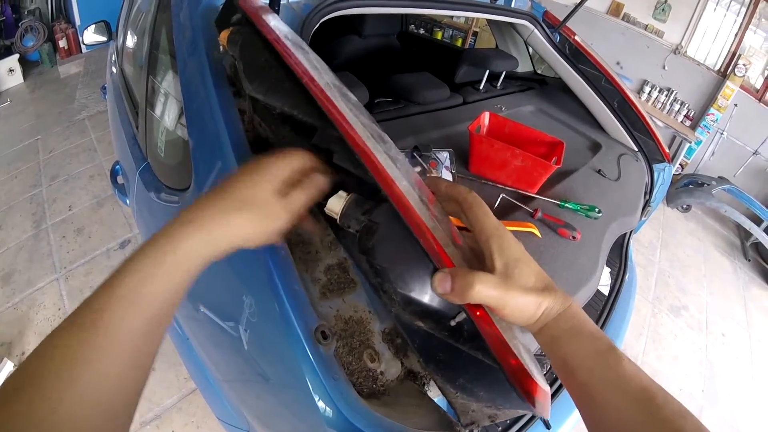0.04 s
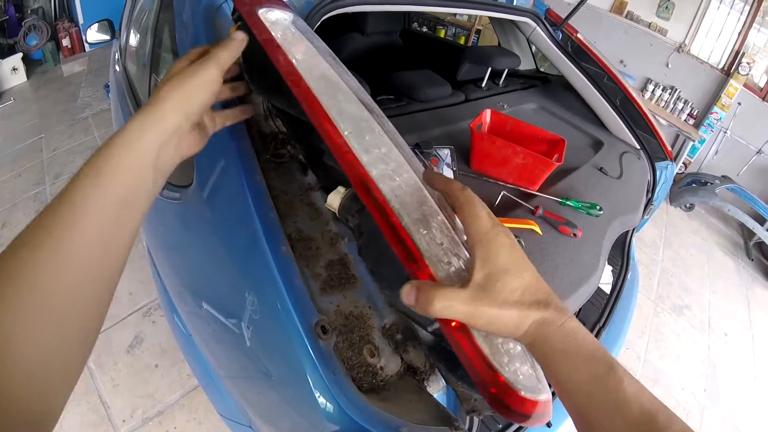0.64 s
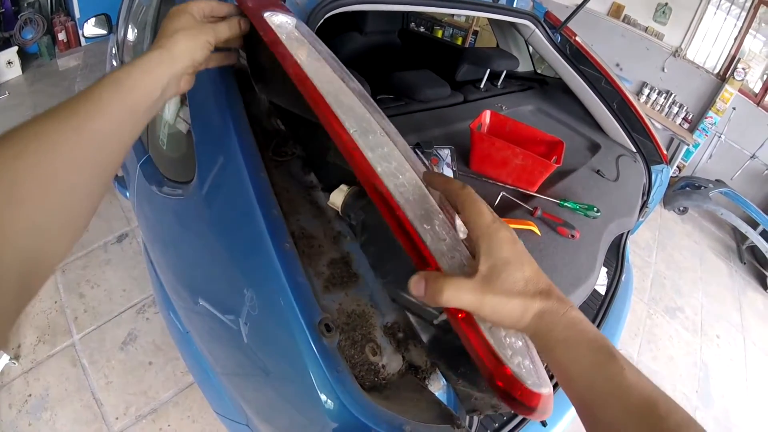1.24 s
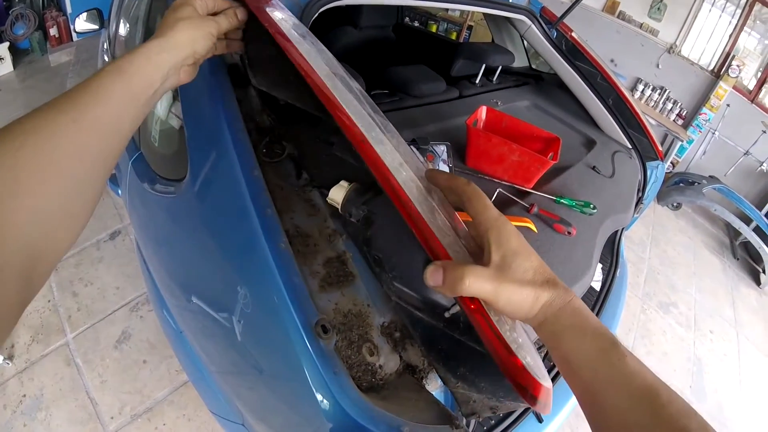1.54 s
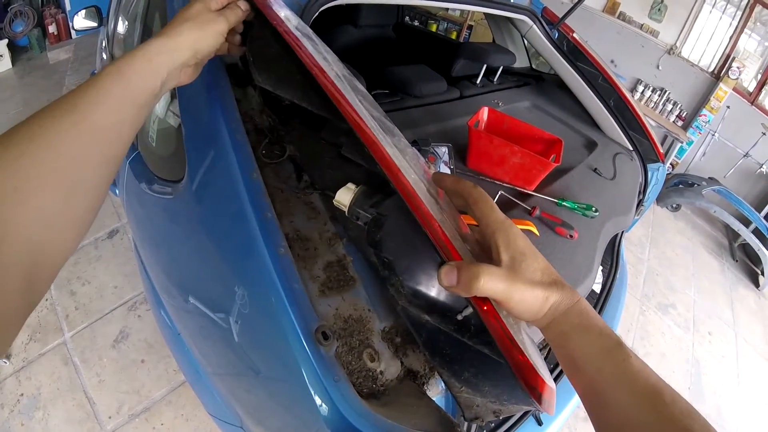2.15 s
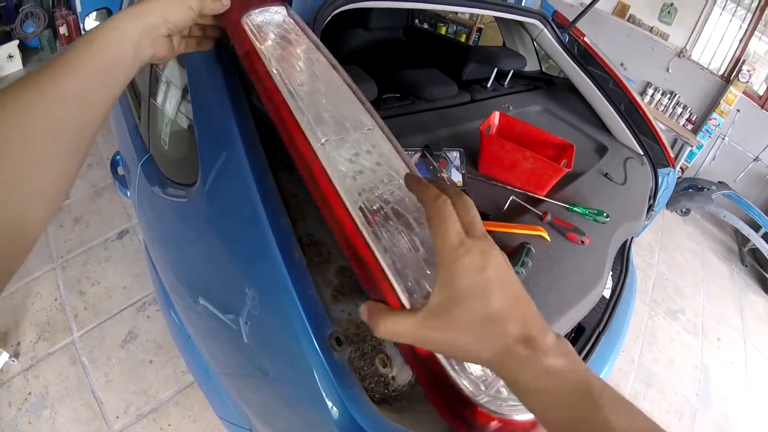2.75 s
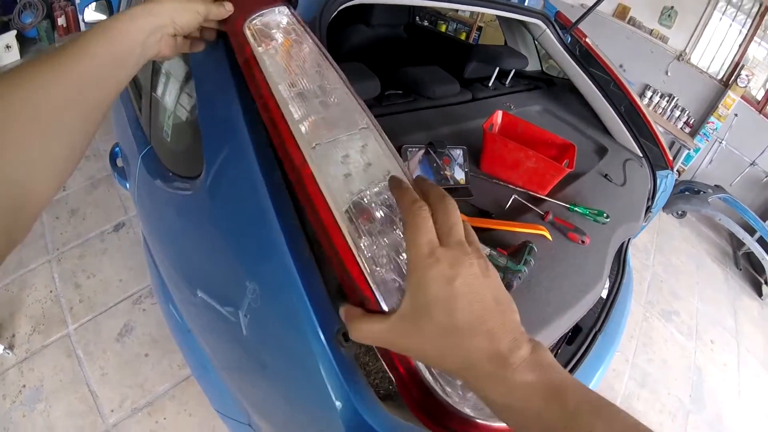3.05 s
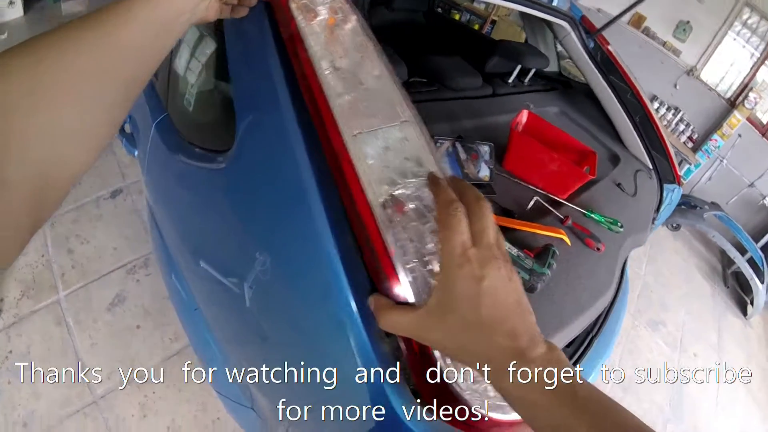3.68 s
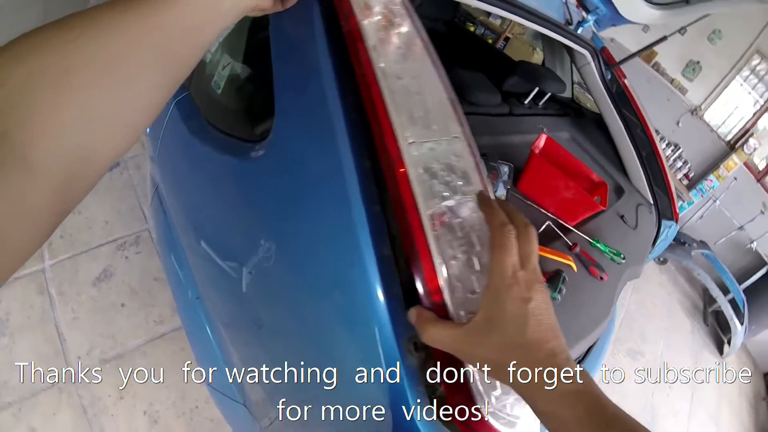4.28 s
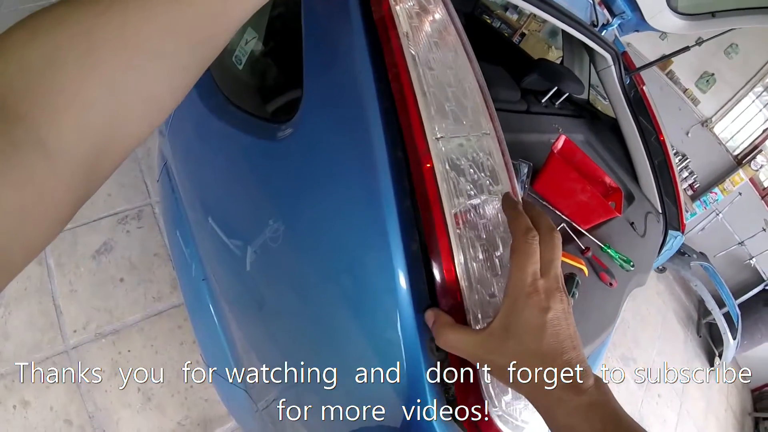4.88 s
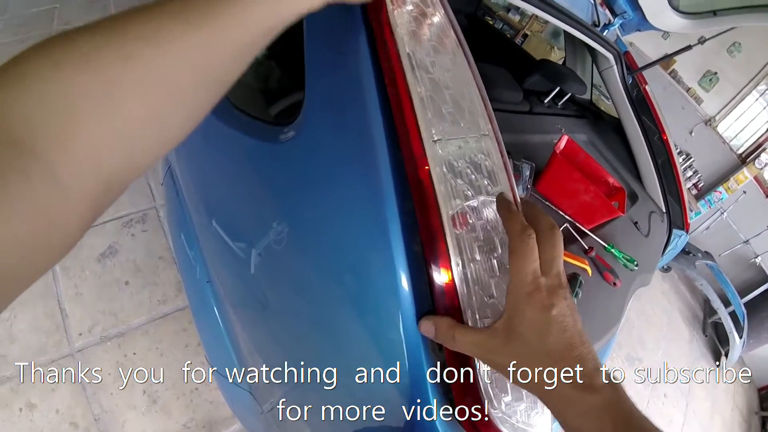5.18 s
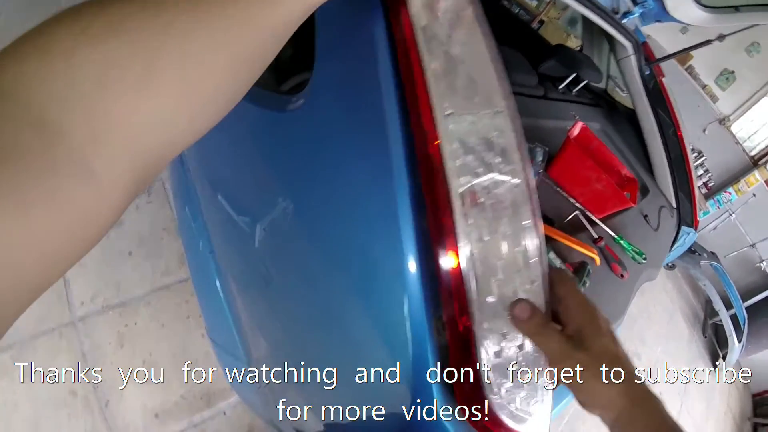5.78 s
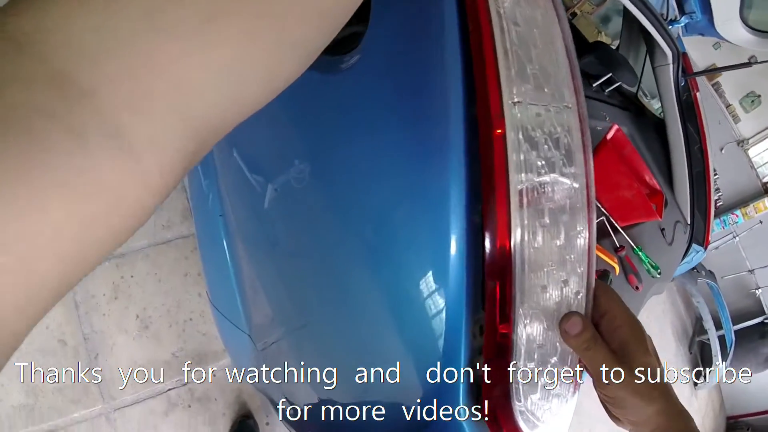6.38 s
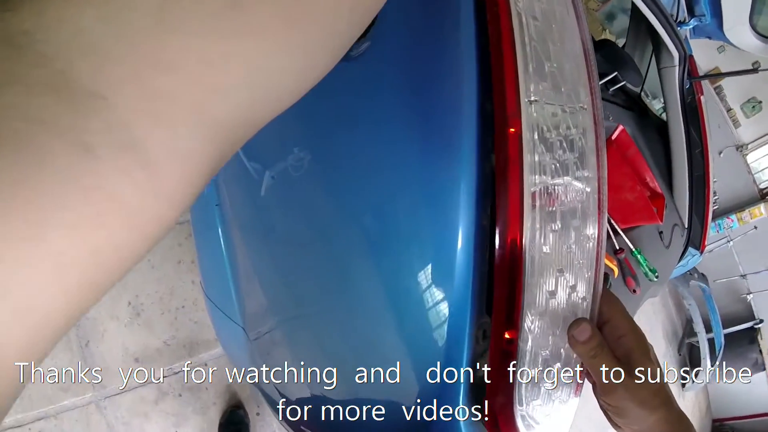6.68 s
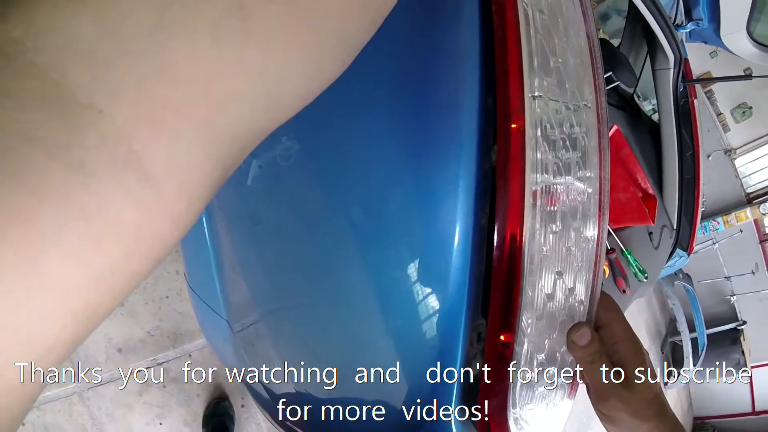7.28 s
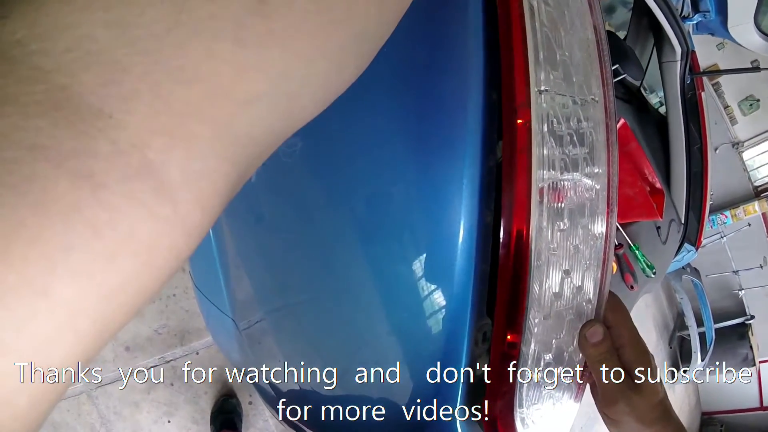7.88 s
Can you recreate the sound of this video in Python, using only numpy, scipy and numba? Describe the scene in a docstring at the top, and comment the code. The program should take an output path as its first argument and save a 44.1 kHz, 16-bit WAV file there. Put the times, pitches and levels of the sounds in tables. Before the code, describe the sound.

A plastic tail light is fitted into a car's steel body, an arm's length from a head-worn microphone. At 0.3 seconds its shell bangs sharply on the metal, by far the loudest sound; everything dips slightly afterwards and creeps back. Fingers and plastic edges scrape in short, quiet strokes between light taps, with a firmer knock near 2 seconds. From 2.4 to 3.8 seconds small tabs tick dryly over the steel among rubs and knocks, the clearest at 2.7. At 5 seconds several knocks and clicks crowd into a quick clatter, with another knock at 5.3. The handling then thins out to soft rubbing, a duller knock at 6.7 and a faint tap near 8. Each hit rings briefly in the open boot and tiled workshop. Underneath run moving air, faint hiss, a low rumble and a distant motor hum swelling around 3 and 6 seconds.

```python
"""A plastic tail light is worked into a car body, an arm's length from a head-worn camera.
At 0.3 s its shell bangs on the sheet steel and ducks the camera's gain, which creeps back.
Edges and fingers scrape in short strokes between lighter knocks; from 2.4 s tabs tick over the steel.
Knocks crowd together at 5 s, then thin out. Throughout, the open boot and the workshop answer,
over air, a low rumble and a far motor's hum."""
import sys
import numpy as np
from scipy import signal
from scipy.fft import rfft, irfft, next_fast_len
from scipy.io import wavfile
from scipy.ndimage import uniform_filter1d
from numba import njit

SR = 44100
rng = np.random.default_rng(int(sys.argv[2]) if len(sys.argv) > 2 else 0)


def output_pcm(signal):
    """Save a mono or channel-first signal as 16-bit PCM at the path in sys.argv[1].

    Samples are clipped to [-1, 1] before scaling.
    """
    pcm = np.clip(np.atleast_2d(signal).T, -1, 1) * 32767
    wavfile.write(sys.argv[1], SR, np.round(pcm).astype(np.int16))


N = 358533
TIME = np.arange(N) / SR


# Each row: start in seconds, level in dB, hardness in dB per octave, steel panel re housing in dB,
# housing centre in Hz, lens centre in Hz, off-centre floor in dB, ring time factor, spill in dB.
KNOCKS = [(0.084, -40.5, 5.5, -21, 510, 1010, -4, 0.87, -13),
          (0.295, -14, 0.6, -10, 394, 1350, -11, 0.62, -1.5), (1.432, -45, 6.5, 1, 400, 1430, 1, 1.05, 6),
          (1.529, -41, 4, -14, 537, 1780, 1, 1, -5), (1.9549, -28.5, -1.6, -2, 418, 1210, -17, .65, -2.5),
          (2.545, -47, -12, -18, 470, 1370, -39, 1.2, -10),
          (2.596, -61, -14.5, -25, 480, 1250, -22, 2.3, 0.5), (2.73, -29, 2, -6, 487, 1060, -21, 0.59, 0.5),
          (2.784, -45, 0, -4, 340, 1300, -9, 0.84, -7), (2.832, -40, 2.5, 1.5, 385, 1090, -11, 1.1, -10),
          (3.068, -41.5, 7, -12, 450, 1710, -21, 0.68, -13), (3.569, -45, -1, -9, 580, 1360, -16, 1.9, -4),
          (3.644, -41.5, 3, -5, 530, 1900, -11, 1.1, -7),
          (4.684, -42.5, -4.5, -5.5, 440, 1270, 3, 0.78, -13),
          (5.003, -52.5, -11, -5, 523, 1300, -12, 4, 8), (5.014, -43, -5, -15, 620, 1400, -13, 1.5, -2),
          (5.027, -32.5, 1.5, -8, 620, 2400, -1, 1.3, -7),
          (5.031, -31.5, -6.5, -15, 595, 1190, -13, 1.18, 1),
          (5.044, -31, 6.5, -6, 610, 1990, -7, 0.98, -12),
          (5.054, -40.5, -10, 6.5, 574, 1150, -27, 1.1, -4),
          (5.309, -33, -0.5, -9, 640, 1320, -15, 0.97, -17),
          (5.508, -47.5, -9.5, -21, 610, 1800, -20, 0.68, 1),
          (5.532, -47, -6.5, -11, 547, 950, -14, 0.74, -2), (5.887, -44, 3, 2, 574, 1280, 1, 1.5, 9),
          (6.683, -29, -6.5, -3, 452, 1140, -13, 0.76, -2.5),
          (6.689, -43, -10, -1, 285, 1150, -20, 0.98, -5), (6.738, -60.5, -13, 12, 297, 1110, -17, 1, -13),
          (8.104, -45, 6, 0, 420, 1310, 3, 1.5, 13)]
# Lamp seated on the steel. Each row: frequency in Hz, level in dB, t60 in seconds.
LAMP_MODES = [(163.7, -1, 0.32), (190.4, 1, 0.15), (200.7, 5.5, 0.2), (236, -5, 0.18), (267, 0, 0.32),
              (301.2, 3, 0.35), (338.5, -0.5, 0.21), (383, 4.5, 0.1), (429, 1, 0.076), (470, -10, 0.17),
              (530.5, -2.5, 0.082), (591, 1, 0.084), (653, -5, 0.1), (730, -20, 0.045), (1010, 6, 0.074),
              (1200, 0, 0.15), (1434, -1.5, 0.054), (1393, 1.5, 0.078), (1694, 2, 0.07), (1860, 1, 0.073),
              (1890, -15, 0.081), (2240, -14, 0.071), (2490, -10, 0.24), (2915, -24, 0.065),
              (3720, -3, 0.094), (4940, 8, 0.059), (5740, -9, 0.038), (6290, 13, 0.082)]
# Panel, housing, lens, tabs. Each row: low edge in Hz, high edge in Hz, crack re ring in dB,
# crack t60 and grip time in seconds (both before the ring time factor), trim in dB.
PARTS = [(152, 186, -17, 0.23, 0.039, -4.5), (238, 637, -2, 0.069, 0.0026, 0),
         (810, 2960, 1.5, 0.081, 0.013, 0), (2400, 7100, 2.5, 0.1, 0.018, -4)]

def knocks(detune=0.0068, held_db=-7.5, contact_s=0.00107, travel_s=0.000482,
           panel_hz=176, tabs_hz=3600, snap_db=-25.0, snap_t60_s=0.018):
    """Shell hits steel: a snap, ringing modes, a dense crack. Returns direct sound and room spill."""
    direct, spill = np.zeros(N), np.zeros(N)
    t = np.arange(SR // 5) / SR
    hz, db, t60 = np.transpose(LAMP_MODES)[:, :, None]
    for start_s, level_db, hardness, steel_db, housing_hz, lens_hz, floor_db, freedom, spill_db in KNOCKS:
        shift, path = rng.standard_normal((2, len(hz), 1))
        age = t / max(freedom, 0.1)  # a firmly held lamp dies sooner
        path_time = t + travel_s * path  # each mode takes its own path to the ear
        modes = undb(db) * fade(age, t60) * np.sin(2 * np.pi * hz * (1 + detune * shift) * path_time)
        housing_db, lens_db, tabs_db = part_levels(level_db, hardness, housing_db=2.5, edge_db=-14.5)
        levels_db = (housing_db + steel_db, housing_db, lens_db, tabs_db)
        centres_hz = (panel_hz, housing_hz, lens_hz, tabs_hz)
        snap = band(rng.standard_normal(len(t)) * fade(t, snap_t60_s), 6500, 9200, order=3)
        blow = undb(tabs_db + snap_db) * unit_burst(snap)
        for part, part_db, centre_hz in zip(PARTS, levels_db, centres_hz):
            lo_hz, hi_hz, crack_db, crack_t60_s, grip_s, trim_db = part
            # hand and seal soak up most of the motion
            grip = undb(held_db) + (1 - undb(held_db)) * np.exp(-age / grip_s)
            ring = grip * np.sum(focus(hz, lo_hz, hi_hz, centre_hz, floor_db) * modes, axis=0)
            crack = fade(age, crack_t60_s) * contact_noise(len(t), lo_hz, hi_hz, centre_hz, floor_db)
            rise = 1 - np.exp(-(2 * t * hi_hz) ** 2)  # heavier parts start slower
            strike = rise * (unit_burst(ring) + undb(crack_db) * unit_burst(crack))
            blow += undb(part_db + trim_db) * unit_burst(strike)
        add(direct, start_s + contact_s, blow)
        add(spill, start_s + contact_s, undb(spill_db) * blow)
    return direct, spill


# Each row: start in seconds, level in dB, centre in Hz.
TICKS = [(2.354, -54, 3500), (2.731, -45, 6000), (2.785, -43, 3100), (2.786, -48, 6400), (2.841, -46, 4400),
         (3.069, -49, 4480), (3.093, -47.5, 2480), (3.611, -49, 4300), (3.649, -55, 4930),
         (3.682, -49, 3600), (3.712, -54, 4900), (3.739, -52, 3700), (3.761, -52, 3400),
         (5.0446, -37.5, 3830), (5.046, -36.5, 2500), (5.372, -53, 3500), (5.493, -45, 3800),
         (5.885, -52, 5960), (5.9, -53, 5100)]
# Each row: frequency in Hz, level in dB, t60 in seconds.
TAB_MODES = [(2540, 1, 0.027), (3130, 6.5, 0.054), (3730, 2, 0.054), (4060, 1, 0.06), (5040, -4, .03),
             (5300, -3, 0.038), (6370, -2.5, 0.1)]

def tab_ticks(crack_db=3.0, crack_t60_s=0.022, floor_db=-19, scatter_db=-1.0):
    """A tab snaps over the steel edge: a dry crack and a very short ring of thin plastic."""
    out = np.zeros(N)
    t = np.arange(SR // 12) / SR
    hz, db, t60 = np.transpose(TAB_MODES)[:, :, None]
    for start_s, level_db, centre_hz in TICKS:
        scatter, phase = rng.standard_normal((2, len(hz), 1))
        gains = focus(hz, 1500, 7500, centre_hz, floor_db) * undb(db + scatter_db * scatter)
        ring = np.sum(gains * fade(t, t60) * np.sin(2 * np.pi * (hz * t + phase)), axis=0)
        crack = fade(t, crack_t60_s) * contact_noise(len(t), 1500, 7200, centre_hz, floor_db)
        tick = unit_burst(ring) + undb(crack_db) * unit_burst(crack)
        add(out, start_s, undb(level_db) * unit_burst(tick))
    return out


# Scrape spectra. Each row: frequency in Hz, relative level in dB.
RUB_HOUSING = [(150, -53), (300, 3.5), (430, -6.5), (540, 3), (700, -5), (900, -27), (1500, -57)]
RUB_LENS = [(600, -11), (850, -1), (1050, 3), (1200, 7), (1420, 1), (1620, -3.5), (1860, 0.5), (2100, -6),
            (2340, 0.5), (2750, -4.5), (3100, -4.5), (5000, -19.5)]
RUB_EDGE = [(1800, -39), (2750, -3), (3100, 0.5), (3600, 4.5), (3950, 1.5), (4300, 1), (5500, 0), (6300, 2),
            (8000, -7.5), (10500, -21), (13000, -53)]

def scrapes(slips_per_s=3600, judder_db=1.5, housing_db=-4.0, lens_db=1, edge_db=-1,
            rasp_hz=1800, rasp_width_hz=130.0, rasp_db=5, slide_octaves=0.17):
    """Plastic slips in dense uneven ticks; a lens resonance wanders as the contact slides."""
    judder = undb(judder_db * np.clip(walk(110), -2, 2))
    slips = (rng.random((3, N)) < slips_per_s / SR) * rng.standard_normal((3, N)) * judder
    housing, lens, edge = map(colour, slips, (RUB_HOUSING, RUB_LENS, RUB_EDGE))
    sliding_hz = rasp_hz * 2 ** (slide_octaves * np.clip(walk(18), -2, 2))
    lens = unit(lens + undb(rasp_db) * resonance(lens, sliding_hz, rasp_width_hz))
    parts = [undb(housing_db) * housing, undb(lens_db) * lens, undb(edge_db) * edge]
    return np.sum(rubbing_force() * parts, axis=0)


# Each row: middle in seconds, half-length in seconds, level in dB, hardness in dB per octave.
STROKES = [(0.098, 0.072, -59.5, -0.5), (1.0, 0.055, -75, 14.5), (1.387, 0.064, -59.5, 1),
           (1.646, 0.078, -58, 0.5), (1.909, 0.03, -58, 1.5), (2.275, 0.067, -55.5, 1),
           (2.333, 0.043, -54, 2), (2.365, 0.04, -46.5, 2), (2.445, 0.046, -60, 1), (2.885, 0.02, -54, -1),
           (3.277, 0.044, -56, -2.5), (3.408, 0.061, -51.5, -2.5), (3.593, 0.046, -47, -1.5),
           (3.636, 0.035, -45.5, -0.5), (3.687, 0.015, -53.5, 0.5), (3.774, 0.077, -49, -0.5),
           (4.017, 0.076, -53, -4), (4.143, 0.033, -53, -4.5), (4.287, 0.08, -54, 0),
           (4.863, 0.099, -54.5, -4), (4.956, 0.032, -51, -4), (5.311, 0.04, -46.5, -4),
           (5.352, 0.054, -55, -6.5), (5.498, 0.024, -54, 4.5), (5.516, 0.048, -49, -2.5),
           (5.583, 0.033, -57.5, -1), (5.782, 0.027, -72, 10), (6.11, 0.16, -57.5, -2),
           (6.447, 0.038, -55, -2), (6.69, 0.024, -48.5, 3), (7.225, 0.016, -72.5, -17.5),
           (7.942, 0.019, -56.5, -5.5), (8.055, 0.041, -67, -11.5)]
# Each row: time in seconds, relative level in dB.
HAND_ACTIVITY = [(0, 1.5), (.6, -2.5), (2.35, -5.5), (2.6, 0), (4.5, -1), (5.55, -3), (5.9, -6), (7.4, -10),
                 (8.13, -5)]

def rubbing_force(fidget_db=-66, spread_db=4):
    """Force on housing, lens and edge: shifting fingers plus short strokes."""
    fingers_db = fidget_db + curve(HAND_ACTIVITY) + spread_db * walk(8.2)
    force = undb(part_levels(fingers_db, 0, housing_db=-11.0, edge_db=-2.5))
    for middle_s, half_s, level_db, hardness in STROKES:
        for part, db in zip(force, part_levels(level_db, hardness, housing_db=4.0, edge_db=-5.0)):
            add(part, middle_s - half_s, undb(db) * swell(half_s))
    return force


# Tailgate and ceiling. Each row: delay in seconds, gain in dB.
ECHOES = [(0.0114, -10), (.033, -14.5)]

def reflections(x):
    """Near surfaces return dull echoes."""
    out, dull = np.zeros(N), band(x, 74, 1370)
    for delay_s, db in ECHOES:
        add(out, delay_s, undb(db) * dull)
    return out


def boot_boom(spill, t60_s=0.3, delay_s=0.016, gain_db=-7.0):
    """The open boot's cavity booms briefly."""
    out = np.zeros(N)
    t = np.arange(SR // 2) / SR
    response = rng.standard_normal(len(t)) * fade(t, t60_s)
    boom = signal.fftconvolve(spill, response / np.linalg.norm(response))
    add(out, delay_s, undb(gain_db) * band(boom, 129, 790))
    return out


# Each row: low edge in Hz, high edge in Hz, t60 in seconds, gain in dB.
REVERB_BANDS = [(124, 284, 0.5, -6), (276, 600, 0.63, -11.5), (744, 1410, 1, -11.5),
                (1440, 2930, 0.71, -14), (2700, 4800, 0.34, -13)]

def workshop_reverb(spill, delay_s=0.012):
    """Energy in each band lingers in the tiled workshop and returns as a diffuse wash."""
    out = np.zeros(N)
    for lo_hz, hi_hz, t60_s, db in REVERB_BANDS:
        pole = fade(1 / SR, t60_s) ** 2
        energy = signal.lfilter([1 - pole], [1, -pole], band(spill, lo_hz, hi_hz, order=3) ** 2)
        add(out, delay_s, undb(db) * np.sqrt(energy) * band_noise(lo_hz, hi_hz, order=3))
    return out


# Each row: frequency in Hz, relative spectral density in dB.
AIR_SPECTRUM = [(70, -10), (110, 1), (150, -3), (220, -2.5), (400, -10), (600, -11.5), (800, -13),
                (1200, -16), (2000, -26), (3500, -35.5), (4300, -46.5), (7000, -34.5)]
HISS_SPECTRUM = [(2000, 3.5), (4200, -6), (6000, -8.5), (6500, 11), (7000, -0.5), (8000, -1.5),
                 (9600, -5.5), (10400, -27), (11500, -7.5), (13000, -13), (14000, -48)]

def air(air_db=-48.0, waver_db=1.26, hiss_db=-63.0):
    """Moving workshop air under steady microphone hiss."""
    draught = undb(air_db + waver_db * walk(15)) * colour(rng.standard_normal(N), AIR_SPECTRUM)
    return draught + undb(hiss_db) * colour(rng.standard_normal(N), HISS_SPECTRUM)


# Each row: time in seconds, level in dB.
DEEP_LEVEL = [(0, -46.5), (1.1, -40), (3.6, -50), (5.4, -46.5), (8.13, -44)]
# Each row: middle in seconds, half-length in seconds, level in dB.
DRONE_SWELLS = [(0.175, 0.06, -43), (5.27, 0.63, -45.5), (5.707, 0.089, -45), (7.083, 0.21, -39.5)]

def rumble(drone_hz=59.5, drone_db=-46.5, waver_db=-1.6, hand_follow=0.43, handling_db=-44):
    """A deep rumble, a swelling drone, and a boom that follows the hands' work on the car."""
    hand_db = curve(HAND_ACTIVITY)
    drone_gain = undb(drone_db + hand_follow * hand_db + waver_db * walk(6.8))
    for middle_s, half_s, db in DRONE_SWELLS:
        add(drone_gain, middle_s - half_s, undb(db) * swell(half_s))
    deep = undb(curve(DEEP_LEVEL)) * band_noise(27.4, 44.3)
    drone = drone_gain * unit(np.sin(2 * np.pi * drone_hz * TIME) + 0.5 * band_noise(50.0, 61.9))
    handling = undb(hand_db + handling_db) * band_noise(72.0, 97.0)
    return deep + drone + handling


# Each row: end of rise in seconds, top level in dB, fall in dB per second.
MOTOR_SWELLS = [(3.17, -39, 62), (4.3, -55, 18), (6.22, -45.5, 14)]

def far_motor(start_hz=250.1, sag_hz_per_s=2.9, floor_db=-72.5, waver_db=2.25,
              rise_db_per_s=25, hold_s=0.2):
    """A nearly pure hum sinks evenly in pitch; each swell rises, holds and fades."""
    hz = start_hz - sag_hz_per_s * TIME
    gain = undb(floor_db)
    for top_s, top_db, fall_db_per_s in MOTOR_SWELLS:
        before_db = rise_db_per_s * np.maximum(top_s - TIME, 0)
        after_db = fall_db_per_s * np.maximum(TIME - top_s - hold_s, 0)
        gain = gain + undb(top_db - before_db - after_db)
    hum = unit(np.sin(2 * np.pi * np.cumsum(hz) / SR))
    return gain * undb(waver_db * walk(12.0)) * hum


def gain_control(x, threshold_db=-20, attack_s=0.011, recover_db_per_s=1.0):
    """A sharp bang turns the gain down just after it passes; the gain creeps back."""
    power = uniform_filter1d(band(x, 1048, 6800) ** 2, size=220)
    over_db = np.maximum(10 * np.log10(np.maximum(power, 1e-12)) - threshold_db, 0)
    recovery_db = recover_db_per_s * TIME
    cut_db = np.maximum.accumulate(over_db + recovery_db) - recovery_db
    pole = np.exp(-1 / (attack_s * SR))
    return x * undb(-signal.lfilter([1 - pole], [1, -pole], cut_db))


def part_levels(db, hardness, housing_db, edge_db, step_octaves=1.64):
    """Housing, lens and edge levels in dB: harder contact moves energy to the higher parts."""
    tilt_db = hardness * step_octaves
    return db + housing_db - tilt_db, db, db + edge_db + tilt_db


def focus(hz, lo_hz, hi_hz, centre_hz, floor_db, octaves=0.32, order=7):
    """A part sounds within its range; the place of contact favours modes near one frequency."""
    in_range = 1 / np.sqrt(1 + (lo_hz / hz) ** (2 * order) + (hz / hi_hz) ** (2 * order))
    peak = np.exp(-0.5 * (np.log2(hz / centre_hz) / octaves) ** 2)
    return in_range * (undb(floor_db) + peak)


def contact_noise(size, lo_hz, hi_hz, centre_hz, floor_db):
    """Noise shaped by focus()."""
    hz = np.maximum(np.fft.rfftfreq(size, 1 / SR), 1)
    return irfft(focus(hz, lo_hz, hi_hz, centre_hz, floor_db) * rfft(rng.standard_normal(size)), size)


@njit
def resonance(x, hz, width_hz):
    """State-variable band-pass with a moving centre, gain 1 there."""
    y = np.empty(len(x))
    band_state, low_state = 0.0, 0.0
    for i in range(len(x)):
        g, damping = np.tan(np.pi * hz[i] / SR), width_hz / hz[i]
        v = (band_state + g * (x[i] - low_state)) / (1 + g * (g + damping))
        band_state = 2 * v - band_state
        low_state += 2 * g * v
        y[i] = damping * v
    return y


def colour(x, spectrum):
    """Filter by (Hz, dB) points, rolling off past both ends; rms 1."""
    hz, db = np.transpose(spectrum)
    size = next_fast_len(N)
    f = np.maximum(np.arange(size // 2 + 1) * SR / size, 1)
    rolloff = np.minimum(1, np.minimum(f / hz[0], hz[-1] / f)) ** 2
    gain = rolloff * undb(np.interp(np.log(f), np.log(hz), db))
    return unit(irfft(rfft(x, size) * gain, size)[:N])


def band(x, lo_hz, hi_hz, order=2):
    """Causal band-pass."""
    return signal.sosfilt(signal.butter(order, [lo_hz, hi_hz], "band", fs=SR, output="sos"), x)


def band_noise(lo_hz, hi_hz, order=2):
    """Band-passed noise, rms 1."""
    return unit(band(rng.standard_normal(N), lo_hz, hi_hz, order))


def walk(rate_hz):
    """Random steps, smoothed twice; rms 1."""
    hold = int(SR / rate_hz)
    steps = np.repeat(rng.standard_normal(N // hold + 1), hold)
    return unit(uniform_filter1d(uniform_filter1d(steps, hold), hold)[:N])


def curve(points):
    """Join (seconds, value) points by straight lines."""
    return np.interp(TIME, *np.transpose(points))


def swell(half_s):
    """Smooth rise and fall, half_s each."""
    return np.sin(np.linspace(0, np.pi, int(2 * half_s * SR))) ** 2


def fade(t, t60):
    """Decay of 60 dB per t60."""
    return np.exp(-np.log(1000) * t / t60)


def undb(db):
    """Decibels to gain."""
    return 10 ** (np.asarray(db) / 20)


def unit(x):
    """Scale to rms 1."""
    return x / np.sqrt(np.mean(x ** 2))


def unit_burst(x):
    """Scale the loudest 5 ms to rms 1."""
    return x / np.sqrt(uniform_filter1d(x ** 2, size=220).max())


def add(out, start_s, x):
    """Mix x into out from start_s on."""
    i = max(0, int(start_s * SR))
    out[i:i + len(x)] += x[:max(0, N - i)]


def scene(tick_spill_db=-5):
    """The lamp, answered by boot and workshop, over the background."""
    blows, blow_spill = knocks()
    rub, ticks = scrapes(), tab_ticks()
    direct = blows + rub + ticks
    spill = blow_spill + rub + undb(tick_spill_db) * ticks
    room = reflections(direct) + boot_boom(spill) + workshop_reverb(spill)
    return (direct + room + air() + rumble() + far_motor())[None]


def record(dry, top_hz=13800):
    """The camera rides its gain and cuts the top."""
    lowpass = signal.ellip(8, 0.2, 70, top_hz, fs=SR, output="sos")
    return signal.sosfilt(lowpass, gain_control(dry[0]))[None]


dry = scene()
out = record(dry)
output_pcm(out)
```